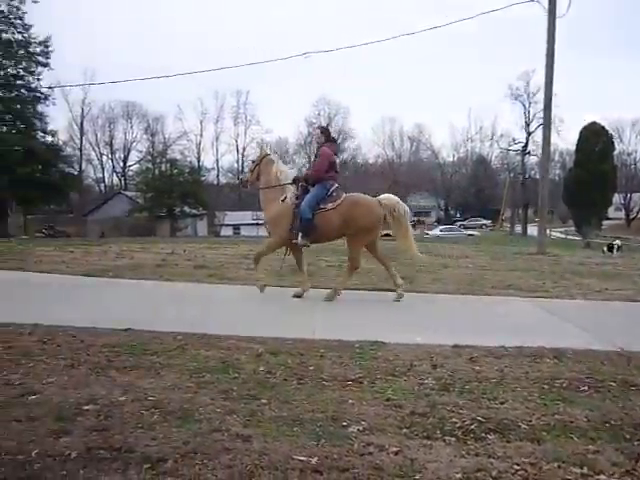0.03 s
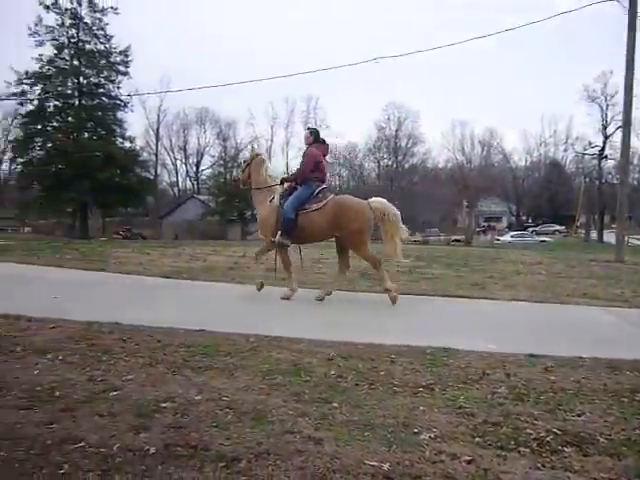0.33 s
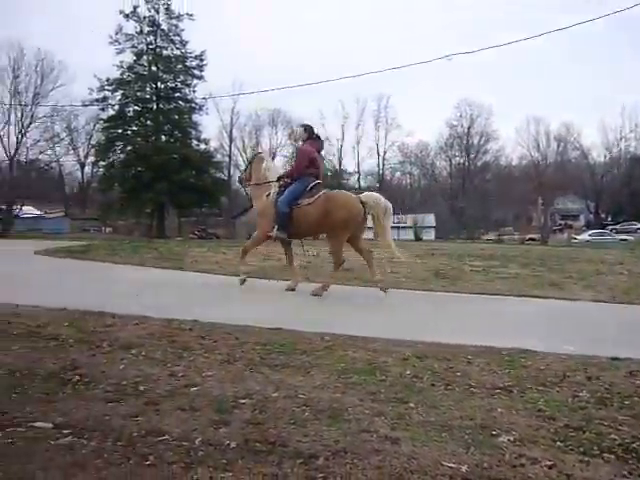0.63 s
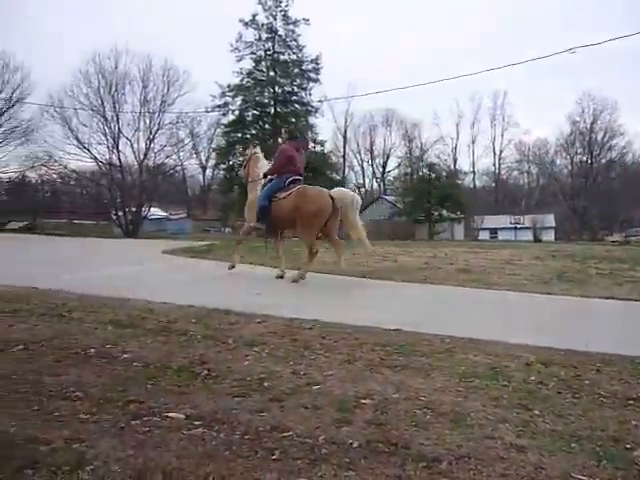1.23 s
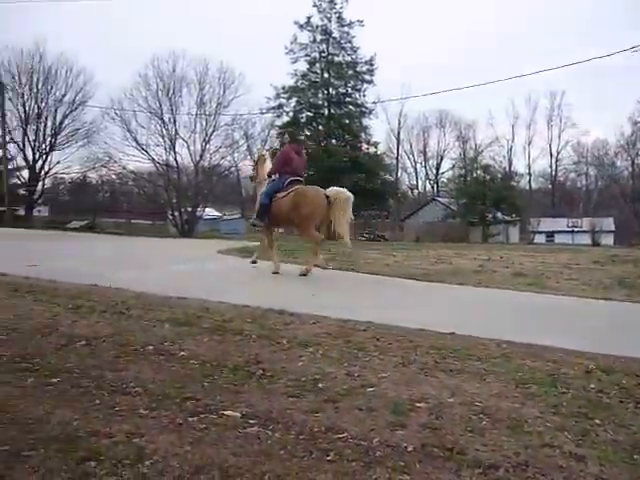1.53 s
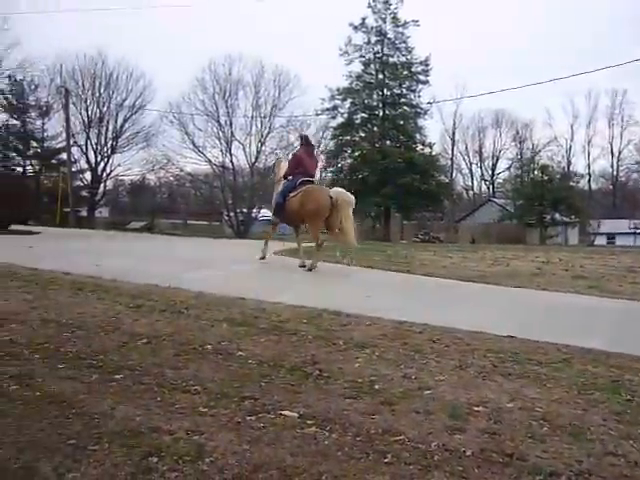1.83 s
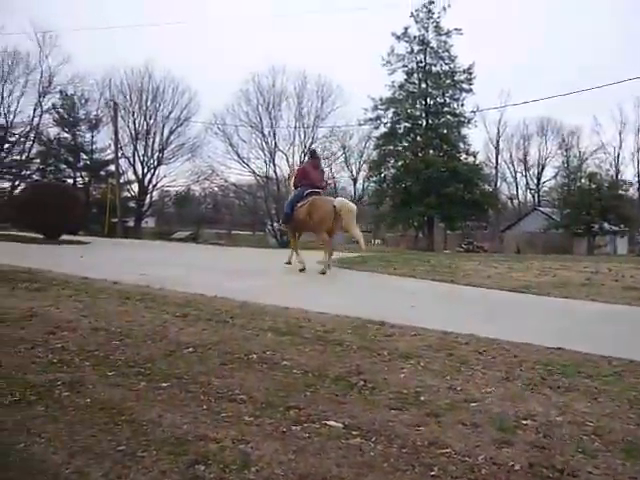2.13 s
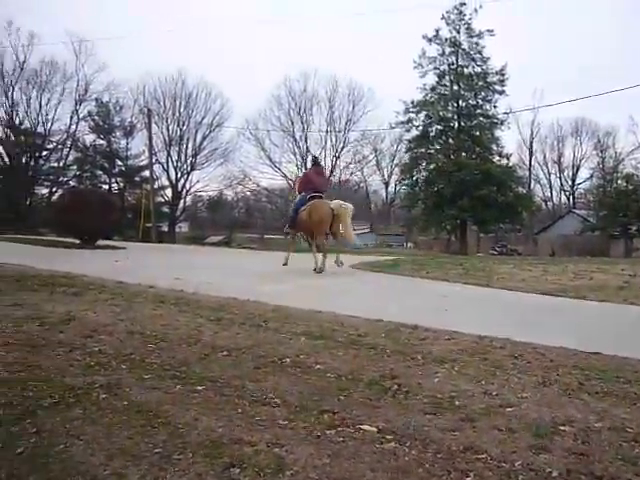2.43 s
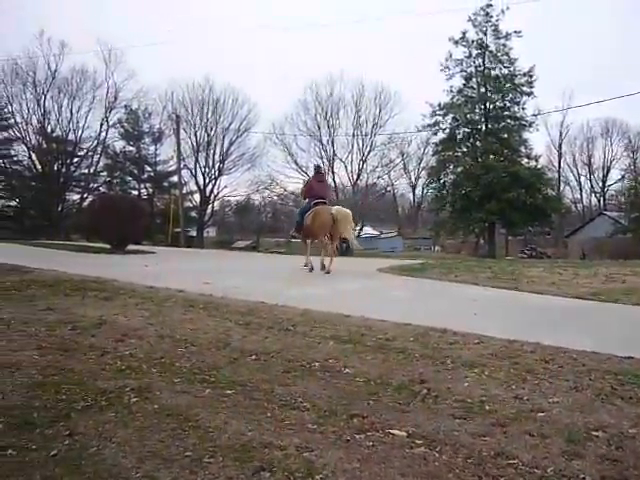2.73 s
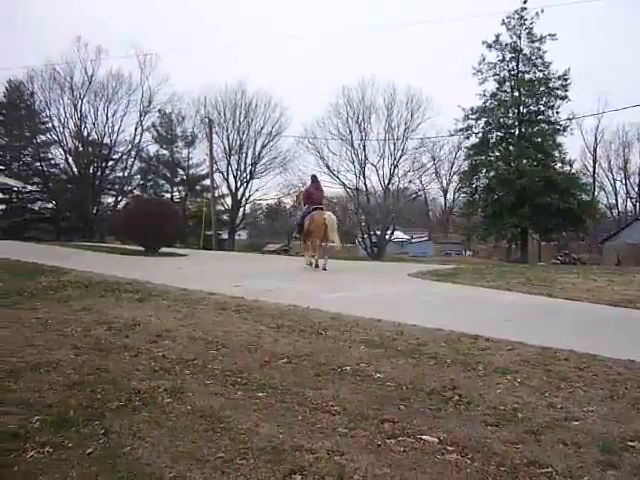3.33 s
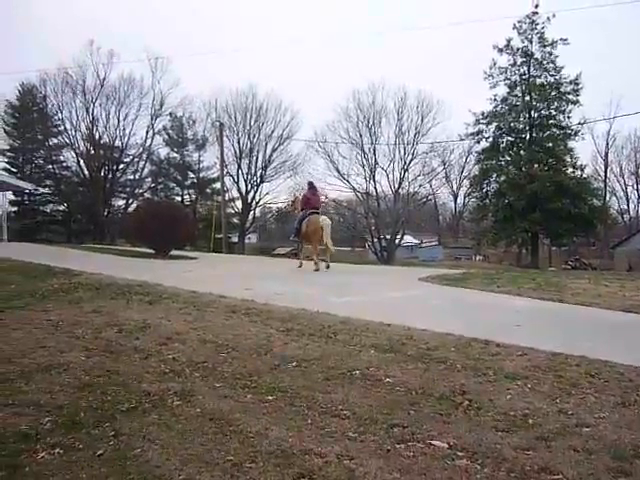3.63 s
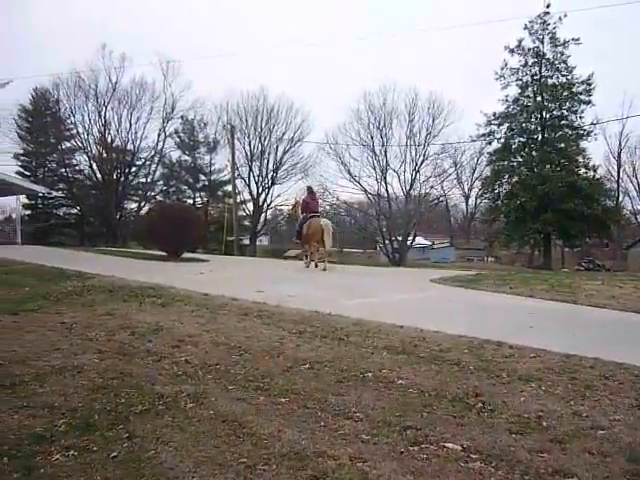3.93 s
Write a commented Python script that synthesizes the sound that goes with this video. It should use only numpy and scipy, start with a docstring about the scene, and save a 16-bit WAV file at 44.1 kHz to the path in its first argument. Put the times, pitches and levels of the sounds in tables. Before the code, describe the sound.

Hooves clop and click on hard pavement as a horse walks through an open yard, lightly tapping and scraping grit between steps. Underneath, the microphone picks up a steady low background noise and a few soft bass thumps.

```python
"""Horse walking on concrete

A horse walks away along a driveway in quick clip-clop pairs. Each landing rings the hollow
hoof near 1 kHz and clicks on the hard surface; between blows the hooves tap lightly and
scuff grit. The yard returns a faint echo. Underneath lie a low, steady bed of outdoor
noise and a few soft bass thumps."""
import sys
import numpy as np
from scipy import signal
from scipy.io import wavfile
from scipy.ndimage import uniform_filter1d

SR = 44100
rng = np.random.default_rng(int(sys.argv[2]) if len(sys.argv) > 2 else 0)


def inscribe(sig):
    """Save sig as 16-bit PCM at rate SR to the path in sys.argv[1].

    A 1-D sig is mono; a 2-D sig holds one channel per row.
    Samples are clipped to [-1, 1] before scaling.
    """
    pcm = np.round(np.clip(np.atleast_2d(sig).T, -1, 1) * 32767)
    wavfile.write(sys.argv[1], SR, pcm.astype(np.int16))


N = 176400

# Levels in all tables are relative.
# Tone of the outdoor bed: f/Hz, level/dB
AIR_EQ = [(25, -15.5), (80, 3), (260, 0), (350, -7.5), (520, -10), (1350, -12.5), (2000, -19),
          (3800, -23.5), (8000, -28.5)]
# Soft low thumps: centre t/s, length/s, level/dB, f/Hz
LOW_THUMPS = [(.095, .05, -27, 166), (0.333, 0.0235, -27.5, 128), (.795, .04, -31, 167.3),
              (1.38, 0.0435, -29, 162), (2.359, 0.11, -33.5, 109.7), (2.442, 0.095, -30.5, 141.3)]
# Reverb time of the yard: f/Hz, t60/s
YARD_DECAY = [(1000, 0.51), (8000, 0.2)]
# Hooves sliding on grit: start t/s, length/s, level/dB
SLIDES = [(0.068,0.038,-30),(0.143,0.051,-42),(0.344,0.051,-40),(0.504,0.054,-49),(0.641,0.036,-34.5),(0.757,0.032,-46.5),(0.945,0.054,-40),(1.08,0.035,-45.5),(1.245,.023,-35),(1.302,0.043,-42),(1.813,0.028,-36.5),(2.245,0.052,-45),(2.384,0.048,-41),(2.987,0.041,-43.5),(3.075,0.033,-41.5),(3.57,.06,-45.5)]
# Tone of crunching grit: f/Hz, level/dB
GRIT_EQ = [(1500, -1), (2000, -19), (2450, 6.5), (3250, 1.5), (3650, -3), (4500, 1), (5700, -1), (6350, -4),
           (8300, -20.5)]
# Tone of the rubbed hoof: f/Hz, level/dB
RUB_EQ = [(220, -14), (450, -23.5), (1030, -3.5), (1250, -15), (1600, -18), (2100, -36), (5000, -43)]
# Light taps of a toe or rim as a hoof lifts or settles: t/s, ring level/dB, tick level/dB
RIM_TAPS = [(0.0968,-16.5,-36.5),(0.1606,-24.5,-33),(0.2098,-13,-32),(0.3572,-27,-36.5),(0.3659,-20,-27),(0.4004,-30.5,-30.5),(0.4392,-21.5,-23),(0.4897,-18,-23),(0.4991,-21.5,-27.5),(.5146,-22.5,-39.5),(0.5469,-37,-33),(0.6144,-22,-29),(0.6506,-19,-23),(0.6689,-19.5,-36),(0.7807,-32.5,-32.5),(0.7921,-24,-34),(.802,-27.5,-52),(0.9347,-25,-23.5),(0.9576,-17.5,-39),(1.0145,-28,-34),(1.0751,-27,-25),(1.0997,-29,-39),(1.1395,-37,-36.5),(1.2015,-20.5,-41.5),(1.24,-30,-25.5),(1.3855,-26,-53),(1.5155,-23,-35.5),(1.5236,-20,-26),(1.5561,-35,-32),(1.5618,-24.5,-29.5),(1.5987,-33.5,-32.5),(1.647,-24.5,-31),(1.6591,-28.5,-34),(1.7009,-28,-32),(1.711,-24.5,-35.5),(1.774,-23.5,-51.5),(1.899,-24.5,-39.5),(1.9052,-27.5,-33),(1.936,-41,-35),(1.9572,-21.5,-29.5),(2.0053,-26,-61),(2.0783,-31,-36),(2.106,-32.5,-27.5),(2.1144,-17.5,-31),(2.1477,-38.5,-31.5),(2.184,-38,-26.5),(2.2608,-25,-41),(2.4023,-27,-33.5),(2.5615,-23.5,-23),(2.6402,-26.5,-39.5),(2.6524,-32,-44),(2.7,-39,-33),(2.7072,-30.5,-39),(2.7353,-31,-37),(2.7786,-33,-32.5),(2.8375,-23.5,-30),(2.8471,-24.5,-35),(3.0051,-30,-27.5),(3.1258,-24,-34.5),(3.1407,-21.5,-28.5),(3.1843,-15.5,-41),(3.2355,-27.5,-45),(3.2862,-38,-32.5),(3.3073,-23,-35),(3.427,-41.5,-33),(3.4371,-21.5,-33.5),(3.4434,-19.5,-31.5),(3.5866,-17,-26.5),(3.6012,-22.5,-36.5),(3.6906,-41,-28.5),(3.7231,-21,-33),(3.764,-18.5,-32),(3.8971,-24.5,-26.5),(3.9011,-24.5,-29),(3.9154,-21,-42),(3.9452,-22,-33),(3.9824,-39,-31.5)]
# Tone of a tap's dry tick: f/Hz, level/dB
TICK_EQ = [(200, 4), (600, -0.5), (1500, 4.5), (2000, -10.5), (2500, 3), (3250, 0), (3700, -10), (4500, -6),
           (5600, -7), (8300, -25)]
# Hooves landing flat under load: t/s, ring level/dB, click level/dB, ring f/Hz, ring t60/s
LANDINGS = [(0.0614,-6,-30,990,.015),(0.0838,-18.5,-27,938,.025),(0.0894,-11.5,-29,962,0.039),(0.2139,-10,-17.5,900,0.021),(0.3766,-17.5,-32,1046,0.034),(0.6205,-7.5,-24,964,0.019),(0.656,-9,-24.5,966,0.028),(0.662,-7,-23,990,0.019),(0.7289,-14.5,-26.5,936,0.012),(0.7859,-13,-26.5,910,0.013),(0.9419,-21.5,-17.5,1080,0.06),(0.9766,-11,-24.5,1010,0.019),(1.2081,-7,-22.5,1007,0.032),(1.247,-16.5,-27.5,930,0.023),(1.2549,-11,-28,1010,0.019),(1.3763,-9,-20.5,1060,0.016),(1.7784,-4,-17.5,1000,0.016),(1.8243,-16,-22.5,1001,0.047),(1.8311,-6,-32,985,0.016),(1.9642,-9.5,-20.5,988,0.019),(2.1226,-13.5,-37,1000,0.018),(2.3676,-4.5,-17.5,987,0.016),(2.4078,-7.5,-21.5,1006,0.02),(2.5577,-6,-26.5,1095,0.0083),(2.715,-13,-29,985,0.013),(2.9537,-3.5,-17,977,.012),(3.0131,-11.5,-23.5,1006,0.016),(3.3003,-15.5,-33.5,994,.015),(3.5462,-6.5,-15.5,1010,.015)]
# Tone of a landing's click: f/Hz, level/dB
CLICK_EQ = [(190, 0.5), (450, -4.5), (1550, 2), (2020, -9.5), (2330, 6), (2850, -10.5), (3200, 0),
            (3600, -10), (3900, -6), (4200, -16), (4500, -4), (5600, -21.5), (8300, -32.5)]


def amp(db):
    """Decibels to gain."""
    return 10 ** (np.asarray(db) / 20)


def unit(x):
    """Scales to rms 1."""
    return x / np.sqrt(np.mean(x ** 2) + 1e-20)


def curve_at(points, hz):
    """Reads a curve on a log-frequency axis."""
    f, value = np.transpose(points)
    return np.interp(np.log(hz + 1), np.log(f + 1), value)


def add(mix, s, sound):
    """Mixes a sound in at s seconds."""
    part = mix[max(round(s * SR), 0):][:len(sound)]
    part += sound[:len(part)]


def equalise(x, points, size=2048):
    """Minimum-phase EQ of unit energy that follows the given curve."""
    log_gain = np.log(amp(curve_at(points, abs(np.fft.fftfreq(size, 1 / SR)))))
    response = np.exp(np.conj(signal.hilbert(log_gain)))
    impulse = np.fft.ifft(response).real[:size // 2]
    return signal.oaconvolve(x, impulse / np.linalg.norm(impulse))[:N]


def drift(count, span):
    """Random modulation of rms 1, smoothed over span points."""
    return unit(uniform_filter1d(rng.standard_normal(count), span))


def patches(shape, rows, columns):
    """A random grid of rms 1, blurred into patches of rows by columns."""
    blurred = uniform_filter1d(rng.standard_normal(shape), rows, axis=0)
    return unit(uniform_filter1d(blurred, columns, axis=1))


def air(level_db=-46.5, patch_db=2.4, swell_db=-0.5, size=1024):
    """Distant outdoor noise, mostly bass, drifting slightly in tone and level."""
    hop = size // 4
    frames, hz = N // hop + 5, np.fft.rfftfreq(size, 1 / SR)
    real, imag = rng.standard_normal((2, frames, len(hz)))
    tone_db = curve_at(AIR_EQ, hz) + patch_db * patches(real.shape, 14, 10)
    spectrum = (real + 1j * imag) * amp(tone_db + swell_db * drift(frames, 80)[:, None])
    bed = signal.istft(spectrum.T, nperseg=size, noverlap=size - hop)[1][:N]
    return amp(level_db) * unit(bed)


def thumps(wander_hz=35):
    """Short, dull swells of bass with a wavering pitch."""
    out = np.zeros(N)
    for s, length, db, hz in LOW_THUMPS:
        count = round(length * SR)
        cycles = np.cumsum(hz + wander_hz * drift(SR, SR // 100)[:count]) / SR
        add(out, s - length / 2, amp(db) * np.hanning(count) * np.sin(2 * np.pi * cycles))
    return out


def yard(x, echo_s=0.098, smear_s=0.0098, echo_db=-25, tail_db=-25.5, damping_hz=2000):
    """Trees and buildings throw back a soft echo and a thin reverb tail."""
    t = np.arange(SR) / SR
    echo, tail = rng.standard_normal((2, SR)) * (rng.random((2, SR)) < 0.1)  # sparse reflections
    hz, age, spectrum = signal.stft(tail, SR, nperseg=256)
    decay = np.exp(-np.log(1000) * age / curve_at(YARD_DECAY, hz)[:, None])
    tail = signal.istft(spectrum * decay, SR)[1][:SR]
    echo *= np.exp(-((t - echo_s) / smear_s) ** 2)
    reflections = amp(tail_db) * unit(tail) + amp(echo_db) * unit(echo)
    darkened = signal.lfilter(*signal.butter(1, damping_hz, fs=SR), reflections)
    return signal.fftconvolve(x, darkened / np.sqrt(SR))[:N]


def pavement(x, depth_db):
    """Every spot of the pavement colours the sound a little differently."""
    spectrum = signal.stft(x, nperseg=256)[2]
    gain = unit(amp(depth_db * patches(spectrum.shape, 4, 4)))
    return signal.istft(spectrum * gain, nperseg=256)[1][:N]


def grit(grains_per_s=6200, spread_db=8):
    """Grains of grit: tiny random impacts of uneven size."""
    size = amp(spread_db * np.minimum(rng.exponential(1, N), 4))
    return unit(size * rng.choice([-1, 1], N) * (rng.random(N) < grains_per_s / SR))


def scuffs(scrapes_per_s=38, scrape_s=0.011, brush_s=0.03, clump_db=2, clump_s=0.0034):
    """Grit crunches under a sliding hoof and stirs its ring; faint scrapes fall in between."""
    scrapes = rng.random(N) < scrapes_per_s / SR
    pressure = amp(-60) * unit(np.convolve(scrapes, np.hanning(round(scrape_s * SR)), "same"))
    for s, length, db in SLIDES:
        add(pressure, s, amp(db - 4) * signal.windows.tukey(round(length * SR), 0.35))
    for s, ring_db, *_ in LANDINGS:  # the sole brushes the ground as it lands
        add(pressure, s - brush_s / 2, amp(ring_db - 39) * np.hanning(round(brush_s * SR)))
    pressure *= unit(amp(clump_db * drift(N, round(clump_s * SR))))  # the hoof catches and slips
    crunch = equalise(pressure * grit(), GRIT_EQ)
    rub = equalise(pressure * grit(), RUB_EQ)
    return pavement(crunch + amp(5.5) * rub, depth_db=3.5)


def mode(t, hz, t60):
    """A struck resonance that falls 60 dB in t60 seconds."""
    return np.sin(2 * np.pi * hz * t) * np.exp(-np.log(1000) * t / t60)


def hoof_strike(hz, t60, roughness, crunch_s, attack_s=0.00022, chatter_s=0.0037):
    """One contact: the ring of the hollow hoof, which grates as it settles, and a gritty click."""
    t = np.arange(SR // 20) / SR
    chatter, crunch = rng.standard_normal((2, len(t)))
    upper_hz = hz * 1.65 * (1 + 0.071 * crunch[-1])  # shifts with the point of contact
    ring = mode(t, hz, t60) - amp(-12) * mode(t, upper_hz, t60=0.0048)
    ring *= 1 - np.exp(-t / attack_s)
    chatter *= np.exp(-t / chatter_s)
    grating = signal.fftconvolve(ring, chatter / np.linalg.norm(chatter))[:len(t)]
    rough_ring = np.std(ring) * unit(ring + roughness * grating)
    click = signal.unit_impulse(len(t)) + 0.24 * crunch * np.exp(-t / crunch_s)
    return rough_ring, click / np.linalg.norm(click)


def hooves(tap_hz=1000, tick_s=0.0021, low_cut_hz=540):
    """A hoof landing under load clops and clacks; a touch of its rim gives a short ring and a dry tick."""
    rings, clicks, ticks = np.zeros((3, N))
    for s, ring_db, click_db, hz, t60 in LANDINGS:
        ring, click = hoof_strike(hz, t60, roughness=0.23, crunch_s=0.00096)
        add(rings, s, amp(ring_db + 3) * ring)
        add(clicks, s, amp(click_db + 19) * click)
    for s, ring_db, tick_db in RIM_TAPS:
        hz = rng.lognormal(np.log(tap_hz), 0.085)  # each tap meets another part of the rim
        crunch_s = rng.lognormal(np.log(tick_s), 0.65)  # and crushes more or less grit
        ring, tick = hoof_strike(hz, t60=0.013, roughness=0.6, crunch_s=crunch_s)
        add(rings, s, amp(ring_db + 4.5) * ring)
        add(ticks, s, amp(tick_db + 20.5) * tick)
    # A hoof radiates little bass.
    body = signal.lfilter(*signal.butter(1, low_cut_hz, "high", fs=SR), rings)
    transients = equalise(clicks, CLICK_EQ) + equalise(ticks, TICK_EQ)
    return body + pavement(transients, depth_db=1.5)


def scene():
    """The mono mix: the horse and its echo over the thumps and the outdoor bed."""
    horse = hooves() + scuffs()
    return (horse + yard(horse) + thumps() + air())[None]


def record(dry, bass_cut_hz=110, treble_cut_hz=8150, dc_offset=-0.075):
    """A small microphone with thin bass, a steep band limit and a constant electrical offset."""
    thin = signal.lfilter(*signal.butter(1, bass_cut_hz, "high", fs=SR), dry)
    lowpass = signal.firwin(301, treble_cut_hz, window=("kaiser", 7), fs=SR)
    return dc_offset + signal.oaconvolve(thin, lowpass[None], "same")


dry = scene()
out = record(dry)
inscribe(out)
```